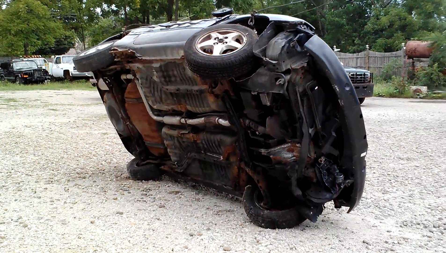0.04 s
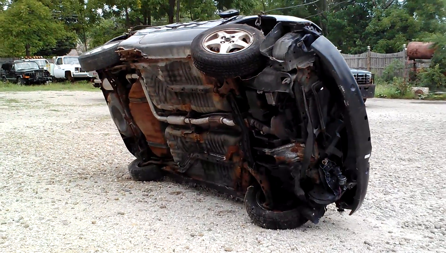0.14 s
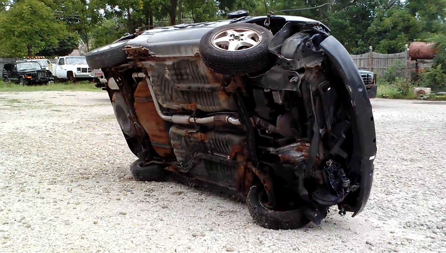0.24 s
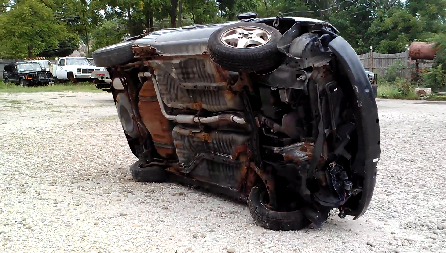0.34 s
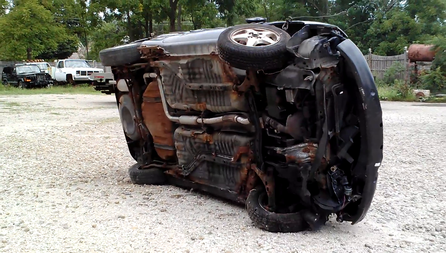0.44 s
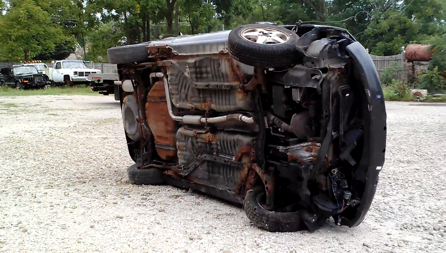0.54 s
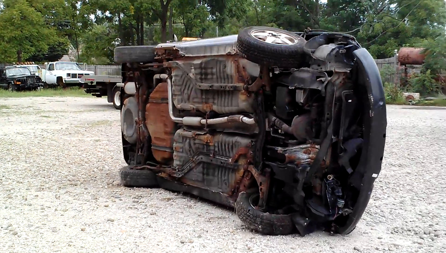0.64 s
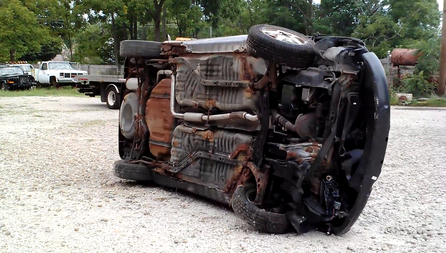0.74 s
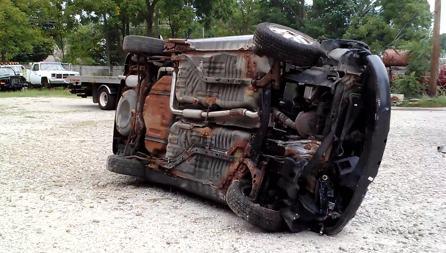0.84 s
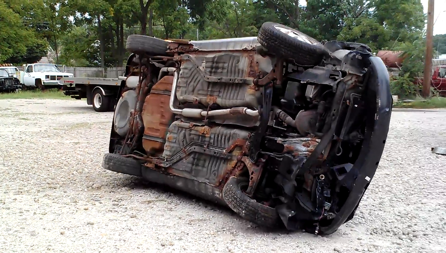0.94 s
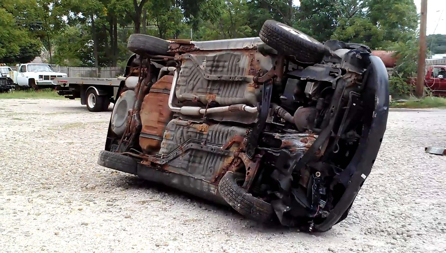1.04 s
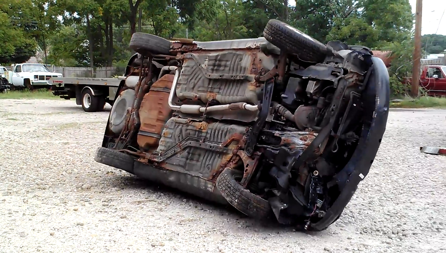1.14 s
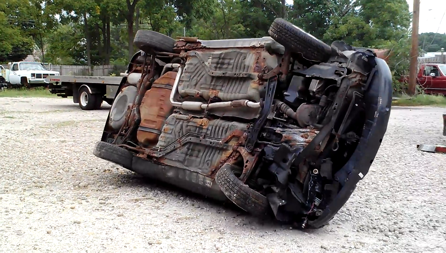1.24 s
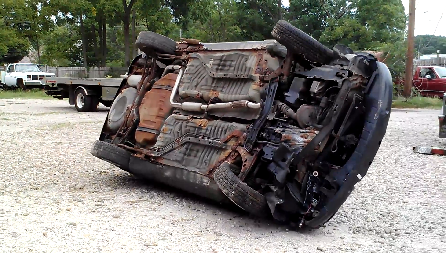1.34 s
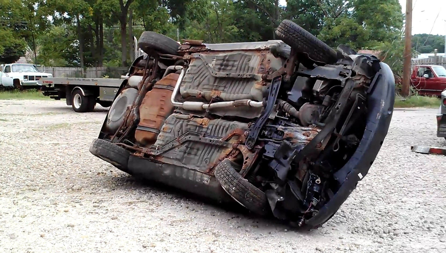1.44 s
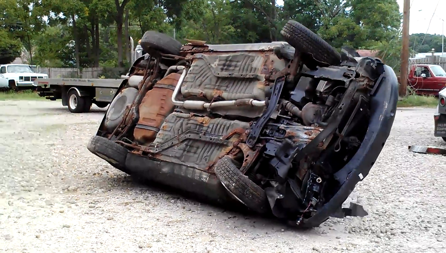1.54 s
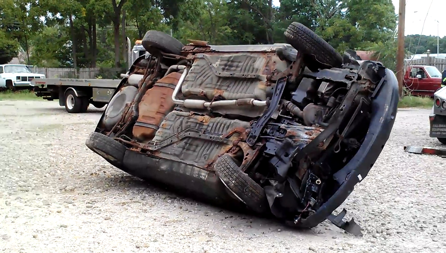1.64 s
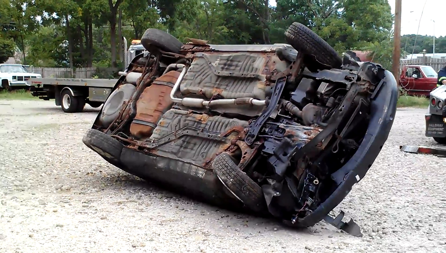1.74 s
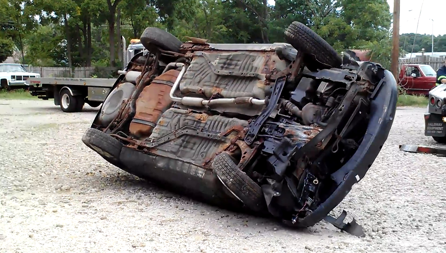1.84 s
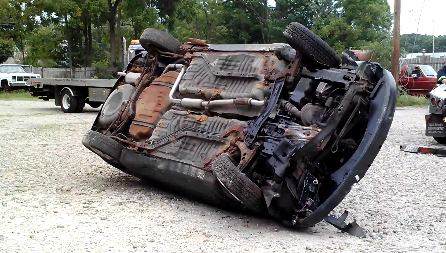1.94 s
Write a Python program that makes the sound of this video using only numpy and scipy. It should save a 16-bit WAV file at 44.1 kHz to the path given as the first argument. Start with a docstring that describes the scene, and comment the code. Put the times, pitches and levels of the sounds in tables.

```python
"""Rollover of a wrecked car body on gravel

Panels thud and boom as decaying modes; trim and glass crack as short noise bursts with a ping.
The shell grinds over stones as filtered random clicks, and bent edges groan and squeal as gliding rough tones.
A faint diffuse echo follows, an engine idles far off as throbbing noise and a hum, and a small camera
a few metres away clips the peaks."""
import sys
import numpy as np
from scipy import signal
from scipy.fft import rfft, irfft
from scipy.io import wavfile
from scipy.ndimage import uniform_filter1d

SR = 44100
rng = np.random.default_rng(int(sys.argv[2]) if len(sys.argv) > 2 else 0)


def digitize_waveform(pressure):
    """Quantize a signal to 16-bit integers and store it at the path in sys.argv[1].

    Rows of a 2-D input are taken as channels; values are limited to [-1, 1].
    """
    field = np.atleast_2d(pressure).T
    bounded = np.clip(field, -1, 1)
    quanta = np.round(bounded * 32767).astype(np.int16)
    wavfile.write(sys.argv[1], SR, quanta)


N = 88200  # samples

# Table levels are relative, and most sources are scaled by the gains further down;
# groans and squeals are used at their tabulated levels.
# thuds of the big panels: [t/s, level/dB, f/Hz, t60/s]
THUD_EVENTS = [(0.003, -14, 192, 0.17), (0.127, -7.5, 91, 0.061), (0.216, -4.5, 780, 0.053),
               (0.343, -6, 303, 0.074), (0.43, -9.5, 717, 0.14), (0.459, -15, 687, 0.1),
               (0.519, -1.5, 766, 0.076), (0.533, 5.5, 738, 0.036), (0.552, -2, 786, 0.12),
               (0.596, 4.5, 309, 0.072), (0.618, -5.5, 280, 0.15), (0.664, -8, 240, 0.051),
               (0.69, 3, 272, 0.099), (0.713, -0.5, 798, 0.083), (0.773, -6, 300, 0.037),
               (0.798, -8.5, 680, 0.19), (0.832, 3, 749, 0.055), (0.834, -1, 1230, 0.063),
               (0.856, -2.5, 250, 0.057), (0.892, -6.5, 301, 0.12), (0.944, -5, 107.4, 0.18),
               (0.996, -0.5, 697, 0.082), (1.0, -11.5, 276, 0.1), (1.058, -1, 493, 0.14),
               (1.072, -4, 295, 0.17), (1.097, -2.5, 327, 0.11), (1.116, -3.5, 790, 0.1),
               (1.122, 0, 302, 0.095), (1.169, 2.5, 290, 0.14), (1.185, 8, 648, 0.047),
               (1.207, -2.5, 403, 0.15), (1.288, -2.5, 280, 0.16), (1.306, 1, 429, 0.066),
               (1.312, -1, 777, 0.06), (1.407, 1.5, 487, 0.054), (1.41, 1.5, 767, 0.046),
               (1.435, 0.5, 926, 0.06), (1.461, -1, 236, 0.024), (1.5, -1.5, 293, 0.047),
               (1.542, 1.5, 864, 0.053), (1.546, 0, 1362, 0.044), (1.558, -7, 1137, 0.056),
               (1.576, 2.5, 351, 0.047), (1.609, 0.5, 752, 0.11), (1.617, -0.5, 623, 0.097),
               (1.654, 0, 1230, 0.035), (1.705, -5.5, 438, 0.11), (1.735, -9.5, 378, 0.19),
               (1.865, -8, 648, 0.063)]
# cracks of trim, glass and thin sheet: [t/s, level/dB, f/Hz, t60/s, treble tilt/dB]
CRACK_EVENTS = [(0.0074, -20.5, 4780, 0.044, 1), (0.041, -27, 2310, 0.059, 16.5),
                (0.1309, -18, 2780, 0.075, -4.5), (0.182, -17, 4220, 0.042, 1),
                (0.2164, -8.5, 3230, 0.082, -3.5), (0.237, -13.5, 3180, 0.04, 5),
                (0.2552, -6, 3000, 0.058, -4.5), (0.2857, -19, 3400, 0.22, 1), (0.313, -17, 3000, 0.032, 6),
                (0.331, -4, 3090, 0.063, -0.5), (0.3455, -13, 2870, 0.04, -3),
                (0.3541, -8.5, 3040, 0.032, -1), (0.377, -12.5, 3110, 0.028, 5),
                (0.404, -14, 3180, 0.066, -1), (0.4315, -7.5, 3010, 0.053, -2),
                (0.4577, -6, 3090, 0.075, -1), (0.4696, -7.5, 2950, 0.06, -2),
                (0.4912, -11.5, 3100, 0.04, -4.5), (0.5331, -2.5, 3174, 0.053, -1),
                (0.5539, -17.5, 2080, 0.19, 5.5), (0.584, -12.5, 2280, 0.22, -3),
                (0.6164, -8, 2880, 0.032, -8), (0.626, -8.5, 2110, 0.067, -13),
                (0.6455, 1, 2830, 0.0081, -16), (0.653, -8.5, 2900, 0.1, -15),
                (0.668, -13.5, 2620, 0.08, -9), (0.7355, -12.5, 2300, 0.2, -3.5),
                (0.7976, -10.5, 2440, 0.057, -6), (0.8305, -13.5, 2030, 0.086, -2),
                (0.9148, -16, 2000, 0.13, 6.5), (0.9395, -10, 2570, 0.15, 2), (0.9944, -15, 2430, 0.052, 1),
                (1.0744, -24.5, 4370, 0.32, 16), (1.1018, -14, 2440, 0.47, -5.5),
                (1.1277, -14, 2320, 0.14, 9.5), (1.1662, -13.5, 2280, 0.063, 5),
                (1.1828, -11, 2200, 0.033, 6.5), (1.2361, -15.5, 2680, 0.19, 0.5),
                (1.3098, -8, 2364, 0.17, 1.5), (1.3556, -12.5, 2400, 0.13, -9),
                (1.3812, -10.5, 4700, 0.085, 8), (1.4076, -15.5, 2350, 0.47, -10),
                (1.436, -6, 2576, 0.069, -10.5), (1.466, -10, 2650, 0.2, -0.5),
                (1.4968, -8.5, 2520, 0.043, -16), (1.5356, -6.5, 5310, 0.16, 3),
                (1.5487, -1, 4760, 0.079, 1), (1.5582, -5.5, 4320, 0.16, -14), (1.591, -3, 2190, 0.092, 1),
                (1.607, -8, 2400, 0.076, -1), (1.6543, -15.5, 2330, 0.058, 8.5),
                (1.6919, -21.5, 2300, 0.49, 1), (1.736, -20, 2730, 0.069, 13),
                (1.8692, -28, 2500, 0.25, 10)]
# course of the grinding: [t/s, panel level/dB, stone level/dB, rumble level/dB]
GRIND_COURSE = [(0.0, -23.5, -32.5, -21), (0.11, -50, -34.5, -58), (0.15, -29, -36, -41),
                (0.28, -20, -32.5, -45), (0.43, -28, -37.5, -20), (0.619, -2.5, -30, -21.5),
                (0.67, -11.5, -23, -11.5), (0.739, -16, -24.5, -24.5), (0.8, -9, -24.5, -12.5),
                (0.92, -12.5, -28, -22), (0.95, -8, -26.5, -19), (1.079, -16, -27, -20),
                (1.09, -10.5, -45, -17), (1.29, -12.5, -22, -11), (1.381, -11, -31, -38),
                (1.531, -9, -17, -17.5), (1.79, -22.5, -32, -33.5), (2.0, -31.5, -37, -56)]
# groans of the bending shell, squeals of sliding edges:
# [t/s, length/s, start f/Hz, end f/Hz, nominal width/Hz, level/dB]
SQUEAL_EVENTS = [(0.053, 0.19, 2805, 2746, 27, -44), (0.126, 0.15, 106.6, 109.5, 17, -34),
                 (.44, 0.24, 506, 487, 14.4, -27), (0.591, 0.098, 312.3, 297.3, 18, -17.5),
                 (0.598, .12, 247.8, 265.4, 17, -16.5), (0.631, 0.04, 3450, 2600, 310, -21.5),
                 (1.054, 0.099, 329, 287, 25, -21), (1.203, 0.066, 245.6, 265, 8, -17),
                 (1.975, 0.062, 3310, 3400, 36, -42)]
# modes of the big panels: [f/Hz, level/dB, t60/s]
PANEL_MODES = [(160.5, -16.5, 0.16), (180, -15.5, 0.094), (278, 11, 0.12), (326, 11.5, 0.11),
               (389, 1.5, 0.26), (485, 12.5, 0.1), (546, -10, 0.054), (617, 12, 0.065), (800, 14, 0.042),
               (867, 1, 0.21), (1132, 2.5, 0.12)]
# modes of the thin sheet: [f/Hz, level/dB, t60/s]
SHEET_MODES = [(2087, 15.5, 0.11), (2590, 0, 0.18), (2330, 4, 0.086), (2800, -4, 0.033), (3290, 15, 0.0097),
               (4050, -22, 0.046), (4320, 3.5, 0.06), (4760, -13.5, 0.15), (4810, 16, 0.025),
               (6600, -6, 0.051)]
# spectrum of the grinding shell: [f/Hz, level per Hz/dB]
SHELL_SPECTRUM = [(88, -40), (150, -8.5), (269, -1.5), (580, -7.5), (744, -4.5), (985, -14.5),
                  (1330, -12.5), (1560, -29.5), (1800, -21.5), (2340, -57.5), (3960, -120)]
# spectrum of cracks and gravel: [f/Hz, level per Hz/dB]
STONE_SPECTRUM = [(1000, -22.5), (1350, -4.5), (1620, -14), (2330, 0.5), (3200, -5), (3720, -11.5),
                  (4180, 0.5), (4900, -3.5), (5600, -7), (6400, -8.5), (7500, -22), (9700, -37.5),
                  (16600, -120)]
# spectrum of the idling engine: [f/Hz, level per Hz/dB]
IDLE_SPECTRUM = [(18, -42), (30, -26), (107, 6.5), (540, -7), (1060, -8.5), (1640, -26.5), (2430, -15),
                 (3690, -24.5), (4330, -24), (7550, -28.5), (9820, -51.5), (16600, -120)]

# Rise times are time constants.
BURST_N = SR // 4  # longest impact, samples
TAP_RISE_S = 0.0021  # shared by knock and ping
THUD_RING_DB, THUD_PANEL_DB, THUD_RISE_S = -6, -17, 0.0031
THUD_ROUGH, THUD_LOW_HZ = 0.29, 112  # noise share of the boom; high-pass corner
BEND = 0.07  # relative rms detuning: the crumpling shell shifts its modes from blow to blow
KNOCK_DB, KNOCK_T60_S, KNOCK_BAND_HZ = -10, 0.036, (433, 1260)
CRACK_RING_DB, CRACK_RING_T60_S, CRACK_RISE_S = -12, 0.005, 0.0006
CRACK_HISS_DB, TILT_HZ = -10.5, 3700  # the tilt pivots at TILT_HZ
PING_DB, PING_T60_S = -3.5, 0.023
GRIND_DB, GRIT_DB, RUMBLE_DB = -6, -8.5, -6
SCRAPE_PER_S, GRIT_PER_S = 912, 4050  # mean click rates
SCRAPE_SPREAD_DB, GRIT_SPREAD_DB = 1.3, 2.2  # mean excess over the smallest click
GRIT_SMEAR_S, RUMBLE_BAND_HZ = 0.0087, (61.6, 175)
FLICKER_DB = 1.5  # rms
PANEL_SHARE, SHEET_SHARE = 0.14, 0.39
YARD_DB, YARD_T60_S, YARD_GAP_S = -16.5, 0.24, 0.008
IDLE_DB, IDLE_SWELL_DB = -32.5, 1.5  # mean level; rms swell
FIRING_HZ, FIRING_DEPTH = 52.94, 0.36
HUM_HZ, HUM_DB = 43.2, -33
MIC_LOW_HZ, MIC_HIGH_HZ, TOP_HZ = 54.4, 9500, 15800
MIC_DIP_HZ, MIC_DIP_SHARE = 8130, 0.55
CLIP = 1.0  # full scale


def undb(db):
    """Logarithmic scale: level in dB to amplitude ratio."""
    return 10 ** (np.asarray(db) / 20)


def unit(x):
    """Normalization to unit rms."""
    return x / np.sqrt(np.mean(x ** 2))


def butter(x, order, hz, kind="low"):
    """Maximally flat (Butterworth) filtering."""
    return signal.sosfilt(signal.butter(order, hz, kind, fs=SR, output="sos"), x)


def ring(x, hz, t60):
    """Damped resonance: a two-pole filter, with t60 no shorter than 5 ms."""
    radius = np.exp(-np.log(1000) / (max(t60, .005) * SR))
    w = 2 * np.pi * hz / SR
    return signal.lfilter([np.sin(w)], [1, -2 * radius * np.cos(w), radius * radius], x)


def modes(x, table, detune=1):
    """Modal superposition: parallel resonances, with about unit gain for white noise."""
    hz, db, t60 = np.array(table, float).T
    power = np.sum(undb(2 * db) * t60 * SR / np.log(1000) / 4)
    total = sum(undb(d) * ring(x, f, t) for f, d, t in zip(hz * detune, db, t60))
    return total / np.sqrt(power)


def colour(x, table):
    """Minimum-phase filtering: a folded cepstrum gives a causal response of the tabulated shape."""
    hz, db = np.array(table, float).T
    f = np.maximum(np.fft.rfftfreq(4096, 1 / SR), 1)
    log_gain = np.interp(np.log(f), np.log(hz), db) * np.log(10) / 20
    cepstrum = irfft(log_gain)
    cepstrum[1:2048] *= 2
    cepstrum[2049:] = 0
    response = irfft(np.exp(rfft(cepstrum)))
    return signal.fftconvolve(x, response / np.sqrt(np.sum(response ** 2)))[:N]


def walk(rate):
    """Slow random fluctuation: twice-smoothed random steps, rate per second, unit rms."""
    k = int(SR / rate)
    steps = np.repeat(rng.standard_normal(N // k + 1), k)
    return unit(uniform_filter1d(uniform_filter1d(steps, k), k)[:N])


def clicks(per_s, spread_db):
    """Random impulse process: either sign, exponentially spread dB sizes, unit rms."""
    u = rng.random((3, N))
    occurs = u[0] < per_s / SR
    size = undb(-spread_db * np.log(1 - u[2]))
    return unit(occurs * np.sign(u[1] - .5) * size)


def shape(rise, t60):
    """Impact envelope: exponential rise and decay, with t60 no shorter than 10 ms."""
    t = np.arange(BURST_N) / SR
    return (1 - np.exp(-t / rise)) * np.exp(-np.log(1000) * t / max(t60, .01))


def add(out, s, x):
    """Superposition: adds x to out from time s."""
    i = int(s * SR)
    out[i:i + len(x)] += x[:max(N - i, 0)]


def thuds():
    """Modal excitation by impact: a knock, an unsteady boom and panel modes detuned at each blow."""
    out, t = np.zeros(N), np.arange(BURST_N) / SR
    for s, db, hz, t60 in THUD_EVENTS:
        noise = rng.standard_normal((2, BURST_N))
        detune = 1 + BEND * rng.standard_normal(len(PANEL_MODES))
        envelope = shape(THUD_RISE_S, t60)
        boom = np.sin(2 * np.pi * hz * t) + THUD_ROUGH * unit(ring(noise[0], hz, 0.035))
        rattle = modes(envelope * noise[1], PANEL_MODES, detune)
        add(out, s, undb(db + THUD_RING_DB) * envelope * boom)
        add(out, s, undb(db + THUD_PANEL_DB) * rattle)
        knock = unit(butter(noise[1], 4, KNOCK_BAND_HZ, "band"))
        add(out, s, undb(db + KNOCK_DB) * shape(TAP_RISE_S, KNOCK_T60_S) * knock)
    return butter(out, 2, THUD_LOW_HZ, "high")


def cracks():
    """Brittle fracture: broadband splintering hisses while each fragment pings at its own pitch."""
    low, high, pitched = np.zeros((3, N))
    t = np.arange(BURST_N) / SR
    for s, db, hz, t60, tilt_db in CRACK_EVENTS:
        envelope = undb(db) * shape(CRACK_RISE_S, t60)
        noise = rng.standard_normal((2, BURST_N))
        add(low, s, undb(-tilt_db / 2) * envelope * noise[0])
        add(high, s, undb(tilt_db / 2) * envelope * noise[0])
        rough_ring = unit(ring(noise[1], hz, CRACK_RING_T60_S))
        add(pitched, s, undb(CRACK_RING_DB) * envelope * rough_ring)
        ping = shape(TAP_RISE_S, PING_T60_S) * np.sin(2 * np.pi * hz * t)
        add(pitched, s, undb(db + PING_DB) * ping)
    burst = butter(low, 2, TILT_HZ) + high - butter(high, 2, TILT_HZ)
    return pitched + undb(CRACK_HISS_DB) * colour(burst, STONE_SPECTRUM)


def grind():
    """Stick-slip on stones: catches shake the panels, fine grit crackles and the ground rumbles."""
    t, course = np.arange(N) / SR, np.array(GRIND_COURSE).T

    def level(column, rate):
        """Amplitude modulation: the tabulated course with random flicker."""
        return undb(np.interp(t, course[0], course[column]) + FLICKER_DB * walk(rate))

    catches = clicks(SCRAPE_PER_S, SCRAPE_SPREAD_DB) * level(1, 24.9)
    shell = colour(catches, SHELL_SPECTRUM) + PANEL_SHARE * modes(catches, PANEL_MODES)

    # each grit click leaves a short ragged tail of noise
    tail_n = np.arange(SR // 20)
    tail = np.abs(rng.standard_normal(len(tail_n))) * np.exp(-tail_n / SR / GRIT_SMEAR_S)
    crackle = signal.fftconvolve(np.abs(clicks(GRIT_PER_S, GRIT_SPREAD_DB)), tail)[:N]
    grit = unit(crackle * rng.standard_normal(N)) * level(2, 40.1)
    stones = colour(grit, STONE_SPECTRUM) + SHEET_SHARE * modes(grit, SHEET_MODES)

    rumble = unit(butter(rng.standard_normal(N), 2, RUMBLE_BAND_HZ, "band")) * level(3, 13.46)
    return undb(GRIND_DB) * shell + undb(GRIT_DB) * stones + undb(RUMBLE_DB) * rumble


def squeals():
    """Narrow-band modulation: a gliding tone, roughened in amplitude and phase, as metal bends or slides."""
    out = np.zeros(N)
    for s, length, from_hz, to_hz, width_hz, db in SQUEAL_EVENTS:
        u = np.linspace(0, 1, int(length * SR))
        noise = rng.standard_normal((2, SR // 4))
        rough = unit(uniform_filter1d(noise, int(SR / width_hz / 2), axis=1))[:, :len(u)]
        phase = 2 * np.pi * np.cumsum(from_hz + (to_hz - from_hz) * u) / SR
        tone = (1 + rough[0]) * np.cos(phase) + rough[1] * np.sin(phase)
        add(out, s, undb(db) * np.sqrt(np.sin(np.pi * u).clip(0)) * tone)
    return out


def yard_echo(car):
    """Diffuse reverberation: convolution with decaying noise after a short gap."""
    t = np.arange(SR // 2) / SR
    tail = rng.standard_normal(len(t)) * np.exp(-np.log(1000) * t / YARD_T60_S) * (t > YARD_GAP_S)
    return undb(YARD_DB) * signal.fftconvolve(car, tail / np.sqrt(np.sum(tail ** 2)))[:N]


def idle():
    """Periodic amplitude modulation: a distant engine's noise throbs at the firing rate over a deep hum."""
    phase = 2 * np.pi * np.cumsum(1 + 0.0017 * walk(6.2)) / SR  # of 1 Hz, wandering slightly
    throb = 1 + FIRING_DEPTH * np.sin(FIRING_HZ * phase)
    rumble = colour(rng.standard_normal(N) * throb, IDLE_SPECTRUM)
    hum = undb(HUM_DB + walk(5.2)) * np.sin(HUM_HZ * phase)
    return undb(IDLE_DB + IDLE_SWELL_DB * walk(4.32)) * rumble + hum


def scene():
    """Linear superposition of the car, its echo and the distant engine."""
    car = thuds() + cracks() + grind() + squeals()
    return (car + yard_echo(car) + idle())[None]


def record(dry):
    """Band limitation and saturation: the camera loses bass and air, dips near the top and clips peaks."""
    x = butter(dry, 5, MIC_LOW_HZ, "high")
    x = x - MIC_DIP_SHARE * signal.lfilter(*signal.iirpeak(MIC_DIP_HZ, 12, fs=SR), x)
    x = signal.sosfilt(signal.ellip(8, .5, 70, MIC_HIGH_HZ, fs=SR, output="sos"), x)
    clipped = np.clip(x, -CLIP, CLIP)
    # a second low-pass trims the overtones made by clipping
    return signal.sosfilt(signal.ellip(10, .2, 80, TOP_HZ, fs=SR, output="sos"), clipped)


dry = scene()
out = record(dry)
digitize_waveform(out)
```